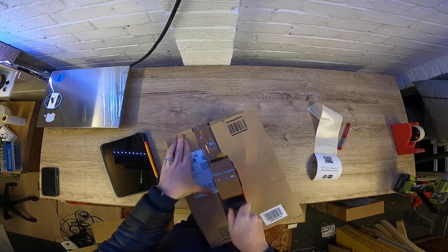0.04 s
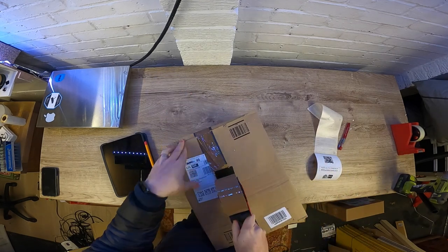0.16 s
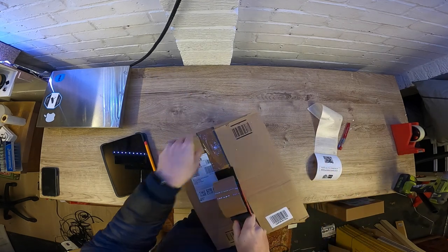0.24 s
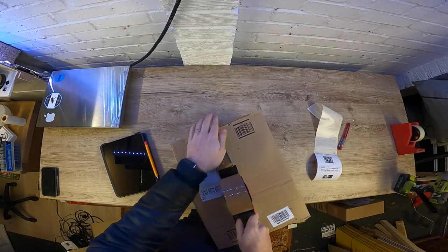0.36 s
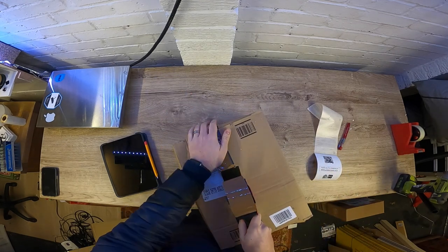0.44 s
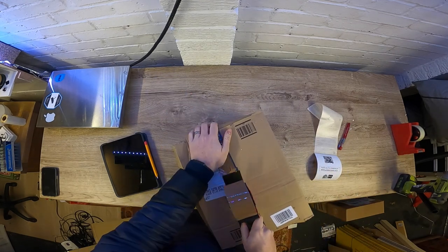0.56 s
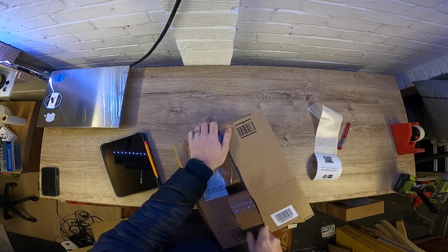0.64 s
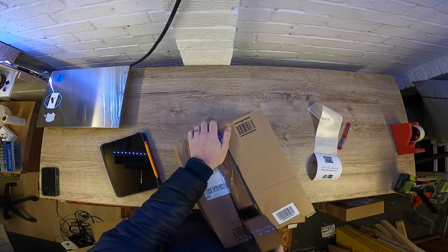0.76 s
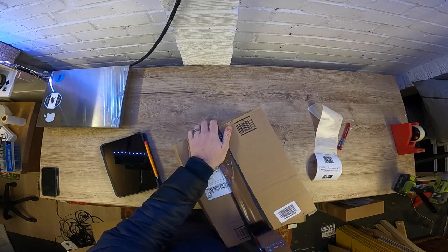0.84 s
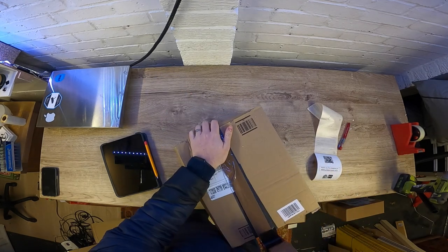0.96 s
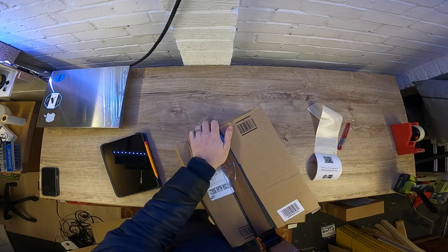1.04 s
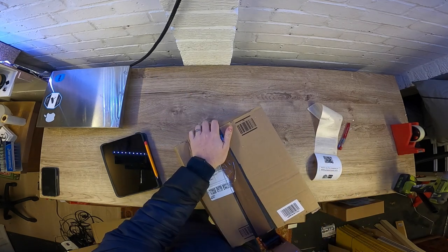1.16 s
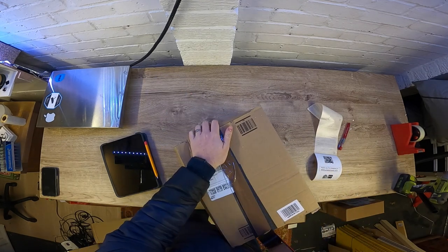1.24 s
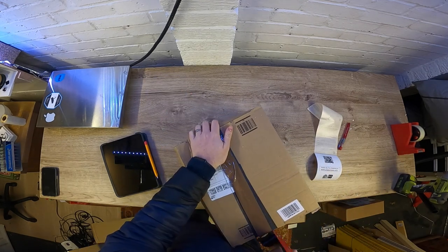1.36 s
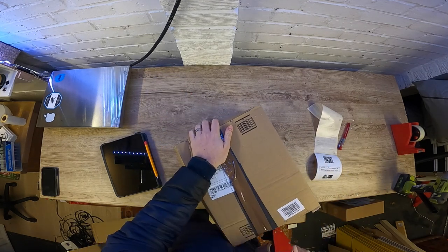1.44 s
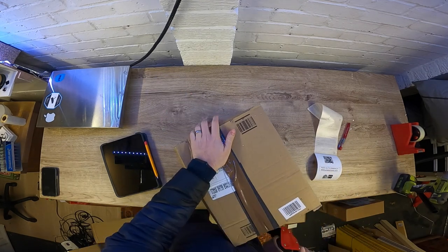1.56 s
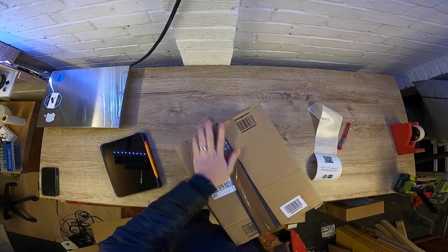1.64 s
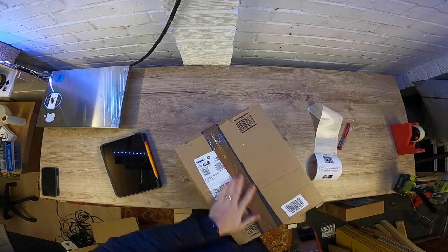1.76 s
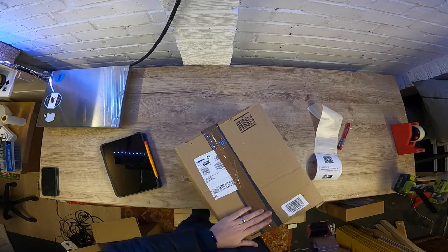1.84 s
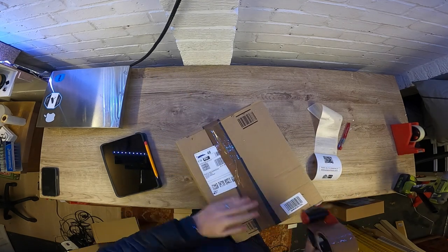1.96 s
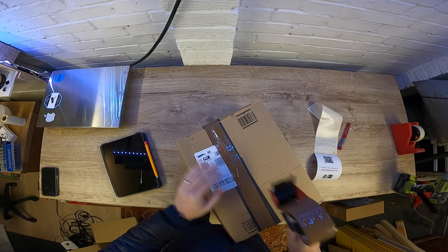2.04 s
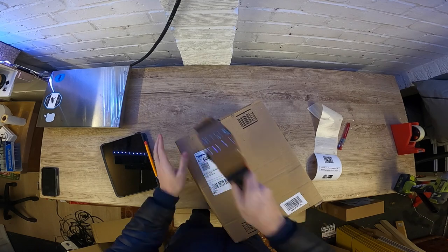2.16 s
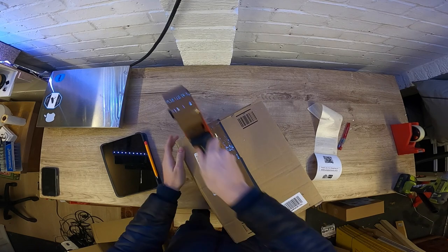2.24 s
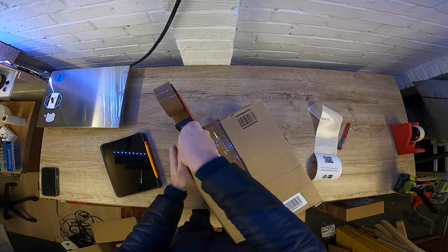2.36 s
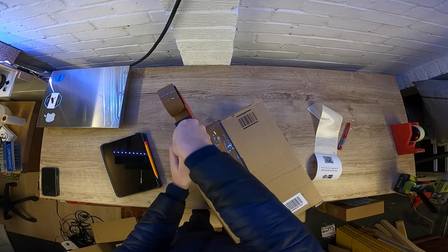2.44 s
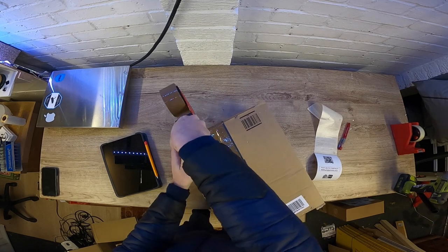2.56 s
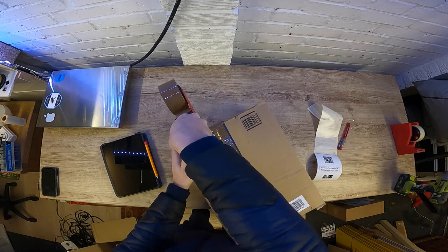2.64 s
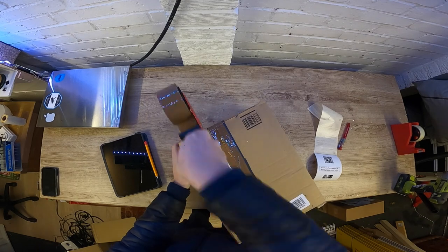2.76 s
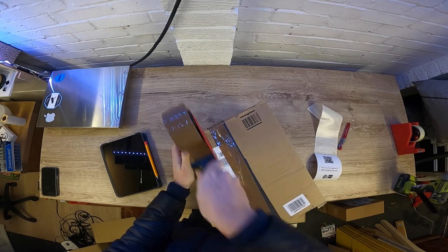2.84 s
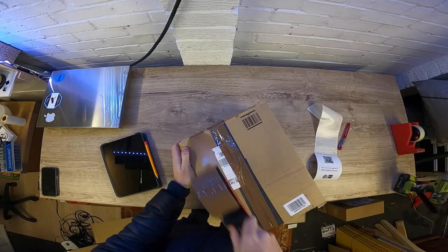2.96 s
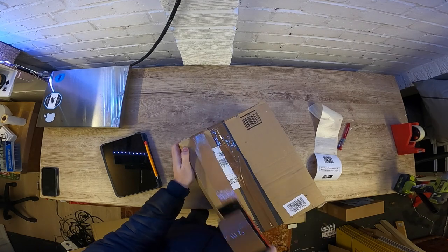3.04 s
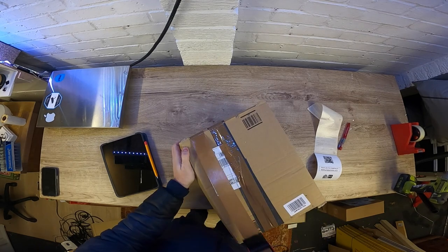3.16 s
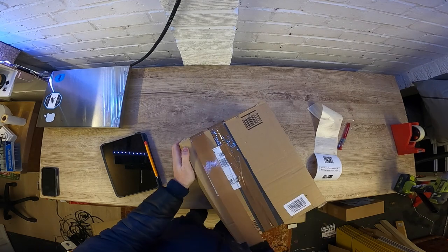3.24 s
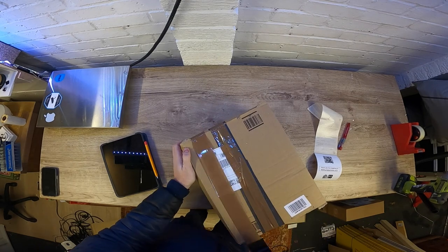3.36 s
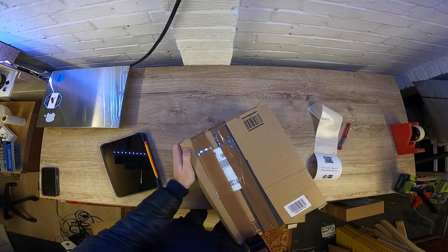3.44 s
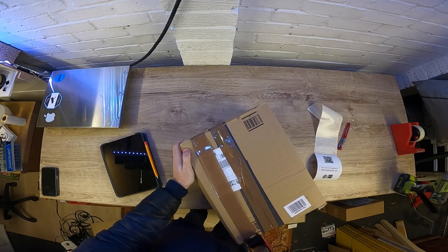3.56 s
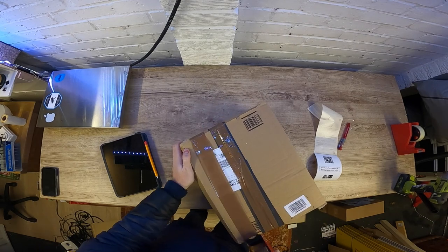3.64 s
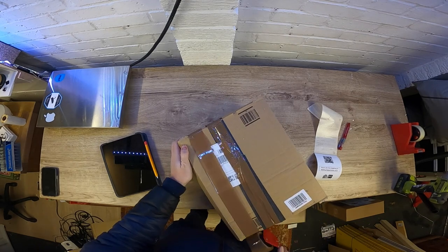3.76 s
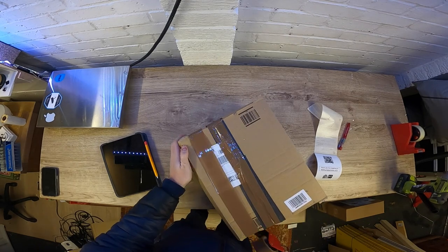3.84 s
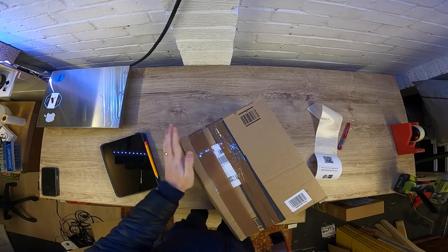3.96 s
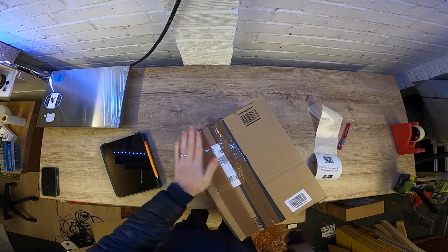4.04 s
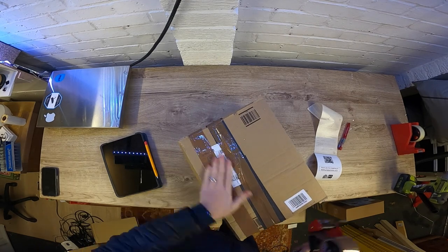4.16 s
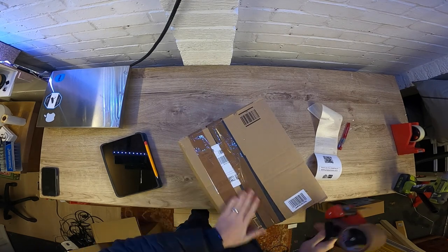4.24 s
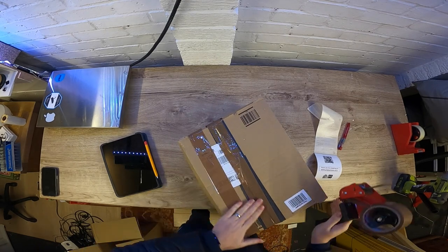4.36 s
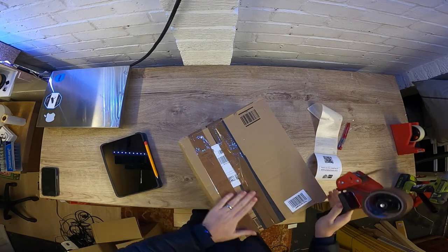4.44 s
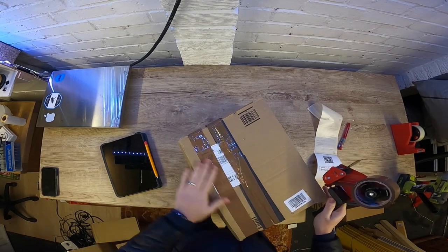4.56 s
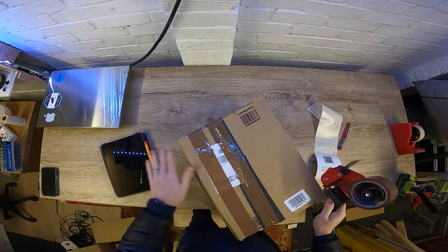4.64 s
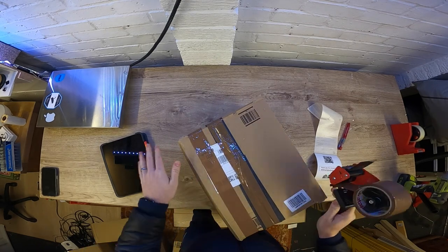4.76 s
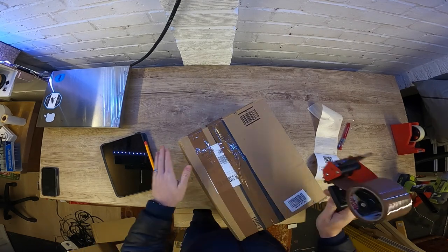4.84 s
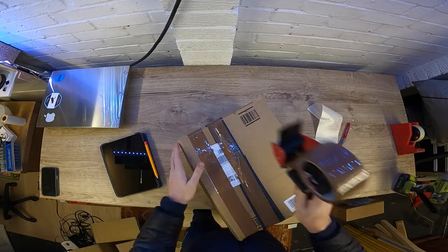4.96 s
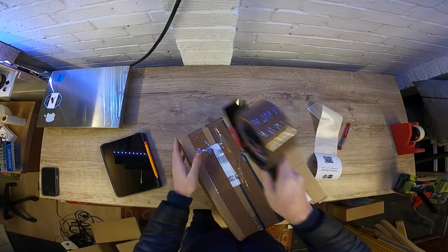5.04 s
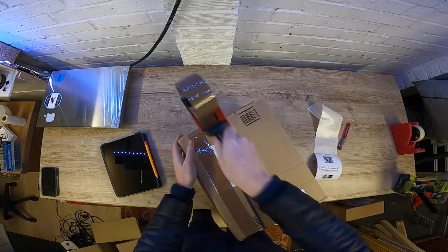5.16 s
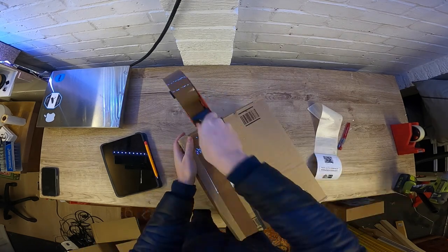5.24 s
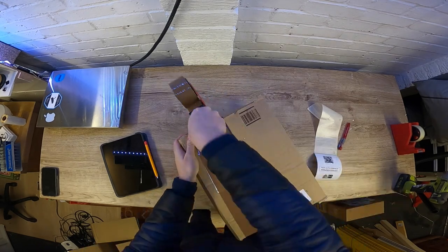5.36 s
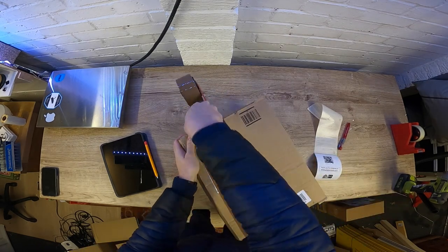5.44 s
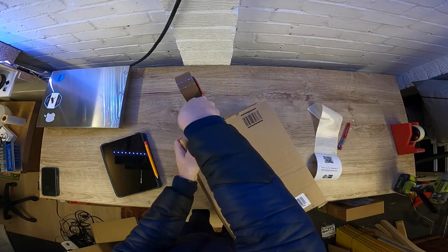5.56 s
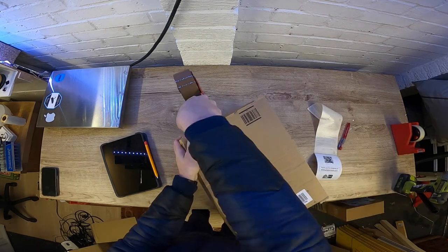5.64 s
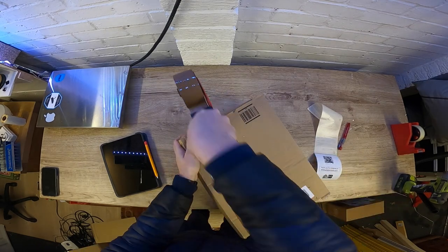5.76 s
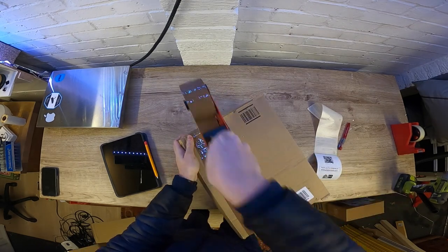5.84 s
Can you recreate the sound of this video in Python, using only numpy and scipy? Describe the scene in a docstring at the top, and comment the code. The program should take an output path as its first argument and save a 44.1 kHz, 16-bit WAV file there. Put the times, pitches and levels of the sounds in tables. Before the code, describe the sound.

Packing tape screeches off a handheld dispenser onto a hollow cardboard box, broken by cutting clacks, knocks and a hand smoothing it down.

```python
"""A small room with a wooden bench, where a tape gun pulls packing tape over a cardboard box.
The tape peels off its roll by stick-slip friction: fast bursts that drive the resonances of the gun,
the hollow box and the bench, while the taut span squeals. Between the pulls the blade cuts, the gun
knocks the box and a hand smooths the tape, hissing over the board and making its walls groan.
Two microphone ports listen from close above."""
import sys
import numpy as np
from scipy import signal
from scipy.fft import rfft, irfft, next_fast_len
from scipy.io import wavfile
from scipy.ndimage import uniform_filter1d, map_coordinates

SR = 44100
rng = np.random.default_rng(int(sys.argv[2]) if len(sys.argv) > 2 else 0)


def digitize_waveform(pressure):
    """Quantize a signal to 16-bit integers and store it at the path in sys.argv[1].

    Rows of a 2-D input are taken as channels; values are limited to [-1, 1].
    """
    field = np.atleast_2d(pressure).T
    bounded = np.clip(field, -1, 1)
    quanta = np.round(bounded * 32767).astype(np.int16)
    wavfile.write(sys.argv[1], SR, quanta)


N = 260190

# spectra of the quiet room, of rubbing skin and of the tape: frequency_hz, relative_density_db
HUSH_SPECTRUM = [(15, -30), (25, 3), (170, -18), (300, -8.5), (700, -18), (4900, -19.5), (12200, -36.5),
                 (15600, -50)]
SKIN_SPECTRUM = [(240, -40.5), (400, -14), (1130, -6.5), (1360, -7.5), (1940, -9), (4650, -6.5),
                 (12000, -24.5), (15600, -32.5)]
TAPE_SPECTRUM = [(300, -4), (600, -3.5), (900, -1), (1600, -1), (2500, -0.5), (4000, -3.5), (5800, -5.5),
                 (7500, -12), (10500, -24), (15600, -34)]
# reverberation time of the room: frequency_hz, t60_s
ROOM_DECAY = [(100, 0.26), (1000, 0.16), (10000, .13)]
# likeness of the two ports: frequency_hz, coherence_ratio
PORT_COHERENCE = [(60, .97), (300, .99), (700, .97), (1400, .9), (3100, .8), (6800, .6), (15000, .35)]
# level difference between the ports: frequency_hz, left_minus_right_db
PORT_BALANCE = [(5000, 0.37), (8000, -4), (15000, -1.5)]
# phase difference between the ports: frequency_hz, left_lead_rad
PORT_PHASE = [(400, 0), (1200, -.2), (2000, -.6), (5400, -1.1), (6550, -1.8), (7150, -3.1), (8400, -6.2),
              (13300, -8.6)]
# normal modes of the bench, the box and the gun's frame: frequency_hz, bandwidth_hz, gain_db
BENCH_MODES = [(52.7, 33, -1.5), (85.3, 28, 5), (145.2, 21, 5)]
BOX_MODES = [(200, 60, -7), (266.3, 19.7, 3.5), (382, 66, -8.5), (511, 94, -7.5)]
FRAME_MODES = [(780, 110, -6), (1060, 160, -4), (1350, 170, 0)]
# a hand or the gun presses on the box and damps it: time_s, grip_fraction
BOX_GRIP = [(2.5, 0.9), (2.63, 0.35), (3.05, 0.14), (3.15, 0.8), (4.8, 1), (5.1, .1)]
# a box wall groans under the hand: start_s, length_s, from_hz, to_hz, level_db
WALL_GROANS = [(1.873, 0.046, 524, 398, -35), (2.563, .07, 380, 450, -32),
               (4.239, 0.086, 227.8, 260, -42.5), (4.301, 0.063, 268.4, 271, -33.5),
               (4.441, 0.058, 176.4, 185, -44.5), (4.564, 0.075, 131, 157, -31),
               (4.641, 0.074, 238, 273, -31.5)]
# hands, sleeves and gun slide on the box:
# start_s, swell_s, hold_s, hiss_db, tilt_db_per_octave, box_db, bench_db
RUB_STROKES = [(0.248, 0.037, 0.094, -52, -4.5, -44, -52), (0.485, 0.043, 0.055, -47, -3.5, -41.5, -37),
               (1.6, 0.066, 0.15, -49.5, -2, -52.5, -51), (1.744, 0.06, 0.11, -36.5, 2, -35.5, -39),
               (1.904, 0.074, 0.075, -48.5, -3.5, -54, -62), (1.937, .2, 0.44, -51.5, -3, -55, -59.5),
               (2.492, 0.051, 0.039, -30.5, -3, -32.5, -41), (3.571, 0.02, 0.076, -63.5, -7, -51.5, -47),
               (3.667, 0.033, 0.14, -50, -4, -42, -52), (3.78, 0.021, 0.05, -59, -11, -58, -33),
               (4.144, 0.037, 0.043, -45.5, 0.5, -49, -41), (4.164, 0.15, 0.02, -41.5, 3, -38.5, -49.5),
               (4.365, 0.077, 0.16, -46.5, 4.5, -55.5, -69), (4.447, 0.18, 0.027, -39, 5.5, -45, -52),
               (4.517, 0.15, 0.036, -37.5, 6, -36, -51), (4.852, 0.29, 0.35, -49, -0.5, -60.5, -73),
               (5.471, 0.044, 0.043, -45.5, 3, -42, -43.5)]
# knocks, cuts and ticks: time_s, crack_db, box_peak_db, bench_peak_db, colour_hz, crack_t60_s
IMPACTS = [(.316, -36, -53, -52, 2850, 0.056), (0.4663, -36, -53, -68, 4840, 0.024),
           (.484, -27.5, -30, -51, 3500, 0.023), (1.168, -45, -59, -70, 6200, 0.022),
           (1.2476, -19.5, -18.5, -23, 2370, 0.15), (1.2714, -18.5, -10.5, -19.5, 2300, 0.064),
           (1.369, -41, -41, -53, 2820, 0.051), (1.3897, -19, -18, -25, 1600, 0.072),
           (1.418, -24, -23, -25, 1840, 0.074), (1.4414, -17.5, -15, -28, 1570, 0.038),
           (1.481, -16.5, -14.5, -14.5, 2600, 0.054), (1.4985, -26.5, -11.5, -12, 3060, .12),
           (1.5416, -32, -15.5, -22, 1000, 0.22), (1.5562, -25, -20, -13, 4600, 0.043),
           (1.782, -35.5, -29.5, -44, 2500, 0.039), (2.379, -41, -38, -38, 2030, 0.04),
           (2.4841, -28.5, -20, -27, 1320, 0.094), (2.5611, -17, -35, -27, 2970, 0.056),
           (2.5758, -17, -19.5, -37, 1210, 0.041), (3.536, -49.5, -73, -70, 3580, 0.047),
           (3.5862, -43.5, -41, -30, 1030, 0.024), (3.6538, -19, -17.5, -43, 3600, 0.078),
           (3.6736, -24.5, -24, -27, 2400, 0.056), (3.7623, -24.5, -25, -23, 2545, 0.086),
           (3.797, -32, -22, -13.5, 1620, 0.12), (3.808, -31.5, -18.5, -12.5, 1020, 0.093),
           (4.167, -40, -27, -39, 1020, 0.12), (4.625, -44, -26, -39, 600, 0.056),
           (5.472, -34.5, -22, -30, 1290, 0.081), (5.4769, -27, -42, -37, 1320, 0.013),
           (5.516, -21, -44, -45, 1490, 0.073), (5.523, -20, -29, -47, 1390, 0.074),
           (5.5727, -17.5, -22, -35, 1270, 0.04), (5.5843, -17.5, -25, -35, 1270, 0.039)]
# the roll squeaks as it stops: time_s, pitch_hz, level_db
ROLL_SQUEAK = [(1.03, 686, -29.5), (1.08, 651, -47.5), (1.17, 740, -88)]
# the free span of tape sings for a moment; the last three rows are the gun frame's top mode ringing near 1.3
# kHz in the last pull: centre_s, pitch_hz, length_s, level_db
SPAN_SQUEALS = [(.05, 2300, 0.092, -29), (.14, 2670, 0.038, -27), (.665, 1920, .03, -27),
                (.79, 1476, 0.061, -32), (.855, 2150, .04, -27), (.91, 1380, .07, -32),
                (.96, 1908, .04, -28), (2.88, 2626, .1, -30.5), (3.0, 2510, 0.11, -30),
                (3.08, 2420, 0.068, -29.5), (3.2, 2610, .13, -35), (5.63, 1290, .055, -27),
                (5.69, 1426, 0.054, -28.5), (5.74, 1327, 0.078, -26.5)]
# how the glue lets go: time_s, slips_per_s, distinct_slip_fraction, sizzle_re_peel_db
GLUE_SLIPS = [(0, 230, 0.33, -17), (1.05, 272, 0, -13.5), (2.63, 180, 0.66, -15), (2.72, 237, 0.1, -37.5),
              (3.29, 200, 0.16, -21.5), (3.33, 72, 0.14, -30), (3.4, 70, 0.68, -20), (5.6, 200, 0, -50)]
# the tape catches for a moment: centre_s, half_width_s, drop_db
TAPE_CATCHES = [(0.176, 0.0067, 10.5)]
# one list of rows for each pull: time_s, peel_db, box_re_peel_db, bench_re_peel_db, frame_re_peel_db
TAPE_PULLS = [
    [(0.0, -22, -7, -9.5, -27), (0.216, -23, -9.5, -9.5, -27), (0.235, -32.5, -11.5, -26, -19)],
    [(0.614, -22.5, -7, -7, -49.5), (.8, -21, -12.5, -19.5, -35), (0.958, -21.5, -5.5, -30, -23),
     (1.055, -28, -0.5, -9.5, -14)],
    [(2.627, -21, 5, -13.5, -15.5), (2.671, -20, 0, -35, -14), (3.02, -20, -5.5, -32.5, -13.5),
     (3.239, -19.5, -16, -33, -39), (3.4, -25.5, 3.5, -3.5, -26)],
    [(5.596, -19, 0, -14.5, -14), (5.76, -21, -3.5, -16, -20), (5.855, -20, -1.5, -29, -11),
     (5.9, -19.5, -4.5, -7.5, -18)],
]


def amp(db):
    """Amplitude ratio of a level in decibels."""
    return 10 ** (np.asarray(db) / 20)


def unit(x):
    """Normalisation to an rms of 1."""
    return x / np.sqrt(np.mean(x ** 2) + 1e-20)


def along(points, hz):
    """Interpolation of (frequency_hz, value) points on a logarithmic frequency axis."""
    f, v = np.transpose(points)
    return np.interp(np.log(hz + 1), np.log(f + 1), v)


def curves(rows):
    """Linear interpolation in time: one value per sample for each column after the first."""
    times, *columns = np.transpose(rows)
    return [np.interp(np.arange(N) / SR, times, column) for column in columns]


def during(tables, fade_s):
    """A time window: 1 while any table lasts, with linear edges."""
    t = np.arange(N) / SR
    edge = lambda u: np.clip(u / fade_s + .5, 0, 1)
    return sum(edge(t - rows[0][0]) * edge(rows[-1][0] - t) for rows in tables)


def wobble(rate_hz):
    """Random modulation: a spline through rate_hz Gaussian values a second."""
    knots = rng.standard_normal(int(N * rate_hz / SR) + 4)
    return map_coordinates(knots, [np.arange(N) * rate_hz / SR])


def filtered(x, response):
    """Linear filtering: the spectrum of x times a complex frequency response."""
    size = next_fast_len(x.shape[-1] + 8192)
    return irfft(rfft(x, size) * response(np.fft.rfftfreq(size, 1 / SR)), size)[..., :x.shape[-1]]


def patchy_noise(depth_db):
    """Comodulation: two independent noises share patches of random gain in time and frequency."""
    spectra = signal.stft(rng.standard_normal((2, N)), nperseg=256)[2]
    patches = uniform_filter1d(rng.standard_normal(spectra.shape[1:]), size=3, axis=0)
    patches = unit(uniform_filter1d(patches, size=8, axis=1))
    return unit(signal.istft(spectra * amp(depth_db * patches), nperseg=256)[1][:, :N])


def room_hush():
    """Ambient noise: steady and random, strongest in the deep bass."""
    return unit(filtered(rng.standard_normal((2, N)), lambda f: amp(along(HUSH_SPECTRUM, f))))


def reverberation(x):
    """Wall absorption: the diffuse field decays exponentially, each frequency at its own rate."""
    hz, t, spectra = signal.stft(rng.standard_normal((2, SR // 2)), SR, nperseg=256)
    tail = signal.istft(spectra * amp(-60 * t / along(ROOM_DECAY, hz)[:, None]), SR, nperseg=256)[1]
    delayed = np.pad(x, ((0, 0), (200, 0)))
    return signal.fftconvolve(delayed, tail / np.linalg.norm(tail[0]), axes=1)[:, :N]


def ports(pair):
    """Partial coherence: mid and side become left and right, alike in the bass, apart in the treble."""
    angle = lambda f: np.arccos(np.clip(along(PORT_COHERENCE, f), -1, 1)) / 2
    mid, side = filtered(pair, lambda f: np.array([np.cos(angle(f)), np.sin(angle(f))]))
    left = lambda f: amp(along(PORT_BALANCE, f) / 2) * np.exp(.5j * along(PORT_PHASE, f))
    return filtered(np.array([mid + side, mid - side]), lambda f: np.array([left(f), 1 / left(f)]))


def resonances(modes):
    """Modal superposition: the frequency response of damped oscillators, alternating in sign."""
    return lambda f: sum((-1) ** k * amp(db) * 1j * f * width / (hz * hz - f * f + 1j * f * width)
                         for k, (hz, width, db) in enumerate(modes))


def softly_driven(modes, cutoff_hz):
    """A compliant contact is a low-pass filter: it feeds the modes little above the cutoff."""
    return lambda f: resonances(modes)(f) / (1 + 1j * f / cutoff_hz) ** 2


def box_vibration(force, cutoff_hz, grip, widening=2.92):
    """Damping broadens and lowers resonances: the box rings when free and is dull when gripped."""
    damped = [(hz, width * widening, db - 10 * np.log10(widening)) for hz, width, db in BOX_MODES]
    free = filtered(force * (1 - grip), softly_driven(BOX_MODES, cutoff_hz))
    return free + filtered(force * grip, softly_driven(damped, cutoff_hz))


def wall_groans():
    """Frequency modulation: a box wall's unsteady tone glides with the pressure of the hand."""
    t, out = np.arange(SR // 8) / SR, np.zeros((2, N))
    unsteady = 1 + .02 * wobble(70)
    for start_s, length_s, from_hz, to_hz, db in WALL_GROANS:
        span = slice(round(start_s * SR), round(start_s * SR) + len(t))
        progress = np.clip(t / length_s, 0, 1)
        phase = 2 * np.pi * np.cumsum((from_hz + (to_hz - from_hz) * progress) * unsteady[span]) / SR
        out[0, span] += amp(db) * np.sqrt(2) * np.sin(np.pi * progress ** 1.8) ** 2 * np.sin(phase)
    return out


def stroke_envelope(tops_db, swell_db=39.5, lift_db_per_s=358.5):
    """Incoherent sources add in power: each stroke swells, holds and dies as the hand lifts."""
    t, power = np.arange(0, N + 64, 64) / SR, 0
    for (start_s, swell_s, hold_s, *_), top_db in zip(RUB_STROKES, tops_db):
        full_s = start_s + swell_s
        rise_db = swell_db * np.clip(full_s - t, 0, 9) / swell_s
        fall_db = lift_db_per_s * np.clip(t - full_s - hold_s, 0, 1)
        power = power + amp(top_db - rise_db - fall_db) ** 2
    return np.interp(np.arange(N) / SR, t, np.sqrt(power))


def rubbing():
    """Sliding friction: skin and cloth on board make a grainy hiss; box and bench murmur below."""
    hiss_db, tilt, box_db, bench_db = np.transpose(RUB_STROKES)[3:]
    grains = patchy_noise(depth_db=2.5) * amp(0.88 * wobble(400))
    below = lambda hz: filtered(grains, lambda f: amp(along(SKIN_SPECTRUM, f)) / (1 + (f / hz) ** 2))
    low, mid, high = np.diff([below(edge_hz) for edge_hz in (1e-9, 1800, 5500, SR)], axis=0)
    lean_db = 1.5 * tilt  # bands 1.5 octaves apart; a faster stroke leans to the upper ones
    hiss = stroke_envelope(hiss_db - lean_db) * low + stroke_envelope(hiss_db) * mid
    hiss += stroke_envelope(hiss_db + lean_db) * high
    box = unit(box_vibration(rng.standard_normal((2, N)), cutoff_hz=265, grip=curves(BOX_GRIP)[0]))
    bench = unit(filtered(rng.standard_normal((2, N)), softly_driven(BENCH_MODES, cutoff_hz=70)))
    murmur = stroke_envelope(box_db) * box + stroke_envelope(bench_db) * bench
    return hiss / np.std(low + mid + high) + murmur


def struck(blows, body):
    """Impulse response: a body's answer to blows, scaled so that a blow of 1 peaks at 1."""
    return body(blows) / np.abs(body(signal.unit_impulse(SR))).max()


def crack(colour_hz, t60_s, tick_db=-12.5, tick_t60_s=0.0079):
    """An impact transient: a bright tick opens a rattling noise burst that decays exponentially."""
    t = np.arange(SR // 4) / SR
    peak = resonances([(colour_hz, .4 * colour_hz, 0)])
    colour = lambda f: amp(along(TAPE_SPECTRUM, f)) * (1 + f / 9000 + 0.61 * peak(f))
    rattle = amp(2.8 * np.repeat(rng.standard_normal(len(t) // 64 + 1), 64)[:len(t)])
    burst = unit(filtered(rng.standard_normal((2, len(t))), colour)) * rattle
    envelope = (1 - np.exp(-t / (0.007 * t60_s))) * amp(-60 * t / t60_s)
    envelope /= envelope.max()
    tick = amp(tick_db - 60 * t / tick_t60_s) * np.diff(rng.standard_normal((2, len(t) + 1)))
    sound = envelope * burst + tick
    return sound * np.linalg.norm(envelope) / np.linalg.norm(sound[0])


def knocks(bench_lag_s=.006, clack_db=4, clack_hz=1340, clack_db_per_octave=45):
    """Impulsive excitation: each contact cracks and rings frame and box; the bench gives way later."""
    cracks = np.zeros((2, N + SR))
    box, bench, frame = np.zeros((3, 2, N))
    for time_s, crack_db, box_db, bench_db, colour_hz, t60_s in IMPACTS:
        onset, sound = round(time_s * SR), crack(colour_hz, t60_s)
        cracks[:, onset:onset + sound.shape[1]] += amp(crack_db) * sound
        box[0, onset] = amp(box_db)
        bench[0, onset + round(bench_lag_s * SR)] = amp(bench_db)
        # the nearer a knock's colour is to the frame's top mode, the more that mode rings
        octaves_off = abs(np.log2(colour_hz / clack_hz))
        frame[0, onset] = amp(crack_db + clack_db - clack_db_per_octave * octaves_off)
    clack = struck(frame, lambda x: filtered(x, lambda f: resonances(FRAME_MODES[-1:])(f) ** 2))
    thud = struck(box, lambda x: box_vibration(x, cutoff_hz=660, grip=0.55))
    rumble = struck(bench, lambda x: filtered(x, softly_driven(BENCH_MODES, cutoff_hz=256.5)))
    return cracks[:, :N] + clack + thud + rumble


def roll_squeak():
    """Frequency modulation: the stopping roll gives a short gliding tone, slightly unsteady."""
    hz, db = curves(ROLL_SQUEAK)
    tone = np.sqrt(2) * np.sin(2 * np.pi * np.cumsum(hz * (1 + 0.027 * wobble(73.8))) / SR)
    return [[1], [0]] * during([ROLL_SQUEAK], fade_s=0.013) * amp(db) * tone


def tape_squeals(faint_count=250, waver_fraction=.05):
    """Vibration under tension: the taut span sings brief wavering tones, some clear and many faint."""
    when, pitch, length, level = rng.random((faint_count, 4)).T
    faint = np.c_[when * N / SR, 900 * 7 ** pitch, .012 + .025 * length, -38 + 6 * level]
    out, margin = np.zeros(N + SR), SR // 2
    waver = waver_fraction * unit(uniform_filter1d(rng.standard_normal(N + SR), size=80))
    for centre_s, hz, length_s, db in np.r_[SPAN_SQUEALS, faint]:
        centre, half = margin + round(centre_s * SR), round(length_s * SR)
        span, t = slice(centre - half, centre + half), np.arange(-half, half) / SR
        glide_hz = hz * (1 - rng.normal(0.145, .4) * t + waver[span])
        tone = np.sin(2 * np.pi * (np.cumsum(glide_hz) / SR + rng.random()))
        out[span] += amp(db) * np.sqrt(2) * np.exp(-(2 * t / length_s) ** 2) * tone
    return out[margin:][:N] * amp(4.24 * wobble(120))


def slip_force(slips_per_s, distinct, first_slip_db=1.5, decay_s=0.0025, snap=0.99):
    """Stick-slip friction: the glue holds and lets go in snaps and bursts, or blurs into noise."""
    cycles = np.cumsum(slips_per_s * amp(1.5 * wobble(60))) / SR
    slips = np.flatnonzero(np.diff(np.floor(cycles)))
    kicks = np.zeros(N)
    kicks[slips] = amp(5.3 * rng.standard_normal(N)[slips])
    kicks[[round(pull[0][0] * SR) for pull in TAPE_PULLS]] = amp(first_slip_db)
    bursts = unit(signal.lfilter([1], [1, -np.exp(-1 / (decay_s * SR))], kicks))
    grains = patchy_noise(depth_db=2.0) * amp(1.5 * wobble(1500))
    return unit(grains * (1 - distinct + distinct * bursts) + [[snap], [0]] * distinct * unit(kicks))


def tape_peel(box_cutoff_hz=1500, sizzle_hz=8500):
    """Forced vibration: the slipping glue drives tape, bench, frame and box while the span squeals."""
    t = np.arange(N) / SR
    peel_db, box_db, bench_db, frame_db = curves(sum(TAPE_PULLS, []))
    slips_per_s, distinct, sizzle_db = curves(GLUE_SLIPS)
    pulling = during(TAPE_PULLS, fade_s=0.00054)
    caught_db = sum(db * np.exp(-((t - centre_s) / width_s) ** 2)
                    for centre_s, width_s, db in TAPE_CATCHES)
    force = slip_force(slips_per_s, distinct) * pulling * amp(peel_db - caught_db + 0.54 * wobble(25))
    tape = lambda f: amp(along(TAPE_SPECTRUM, f))
    sizzle = lambda f: tape(f) * (f / sizzle_hz) ** 4 / (1 + (f / sizzle_hz) ** 4)
    bench, frame = softly_driven(BENCH_MODES, cutoff_hz=155), resonances(FRAME_MODES)
    paths = [(tape, 0), (sizzle, sizzle_db), (bench, bench_db), (frame, frame_db)]
    rms_gain = lambda response: np.sqrt(np.mean(np.abs(response(np.arange(SR / 2))) ** 2))
    rasp = sum(filtered(force * amp(db), response) / rms_gain(response) for response, db in paths)
    drumming = box_vibration(force * amp(box_db), box_cutoff_hz, grip=curves(BOX_GRIP)[0])
    drumming /= rms_gain(softly_driven(BOX_MODES, box_cutoff_hz))
    tautness = pulling * np.minimum(amp(peel_db + 23.5), 1) ** 2  # squeals die as the pull slackens
    return rasp + drumming + [[1.4], [.5]] * tautness * tape_squeals()


def scene():
    """Superposition: direct sound, reverberation and the room's hush add at the two ports."""
    direct = tape_peel() + rubbing() + knocks() + roll_squeak() + wall_groans()
    hush = amp(-63) * room_hush()
    return ports(direct + amp(-9.5) * reverberation(direct) + hush)


def record(dry, ceiling=.62, top_hz=15741):
    """Soft saturation rounds the loudest peaks; a low-pass filter then limits the band."""
    rounded = dry / (1 + np.abs(dry / ceiling) ** 4) ** (1 / 4)
    return filtered(rounded, lambda hz: np.clip((top_hz - hz) / 500, 0, 1))


dry = scene()
out = record(dry)
digitize_waveform(out)
```